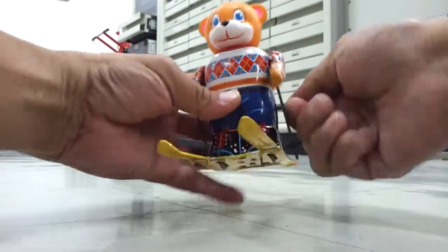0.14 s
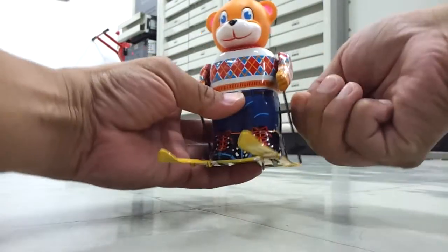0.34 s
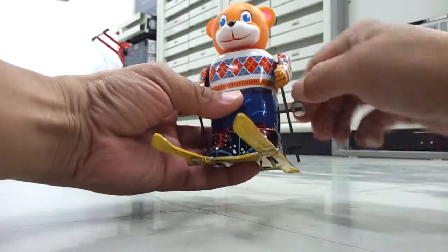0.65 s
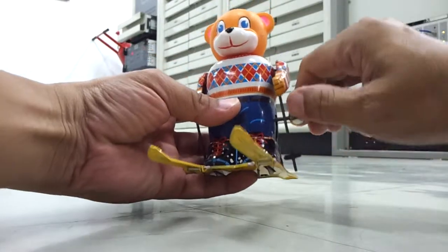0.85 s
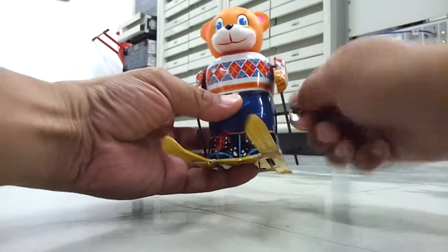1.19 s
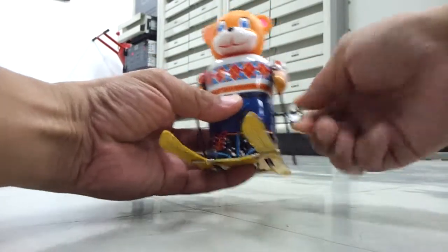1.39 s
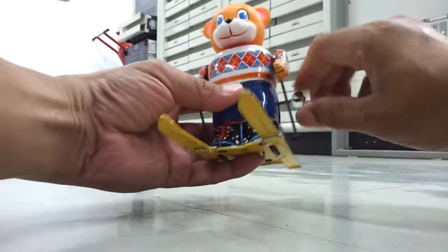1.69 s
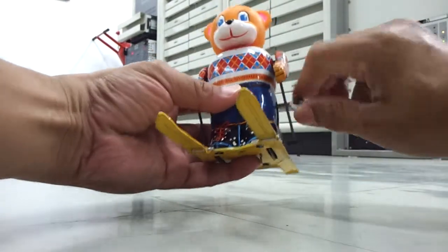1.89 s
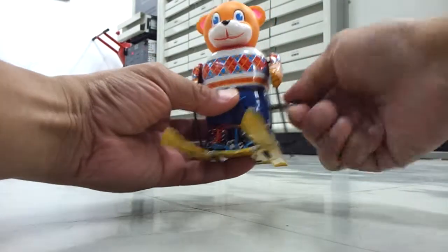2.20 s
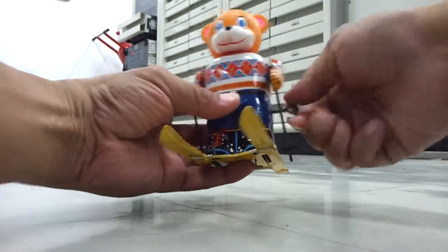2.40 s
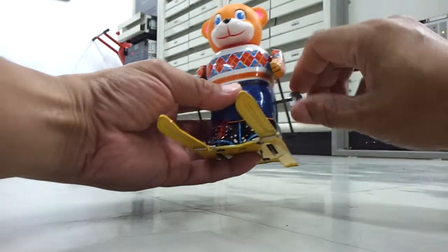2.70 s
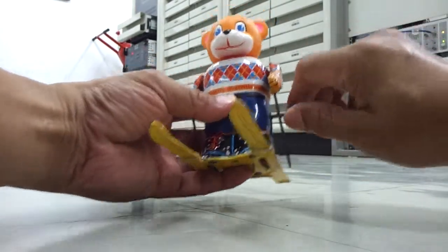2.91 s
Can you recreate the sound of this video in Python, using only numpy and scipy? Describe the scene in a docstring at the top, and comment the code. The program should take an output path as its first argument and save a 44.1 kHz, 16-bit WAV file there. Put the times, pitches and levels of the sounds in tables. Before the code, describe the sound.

A tin wind-up toy is wound by hand close to the microphone. The ratchet purrs briefly, then the key catches in sharp, irregular metallic clicks. Ventilation rushes and hums steadily in the room behind.

```python
"""The steel key of a tin wind-up toy, turned by hand up close. The ratchet purrs, then the key
catches in short chattering clicks that ring the tin shell; twice it pings as the fingers let go.
Behind it a ventilation machine rushes and hums, with a faint electric whine.
The clicks sound bright on the left and duller on the right, with a short room tail."""
import sys
import numpy as np
from scipy import signal
from scipy.fft import rfft, irfft, next_fast_len
from scipy.io import wavfile
from scipy.ndimage import map_coordinates

SR = 44100
rng = np.random.default_rng(int(sys.argv[2]) if len(sys.argv) > 2 else 0)


def master(y):
    """Save y as 16-bit WAV."""
    cut = np.clip(np.atleast_2d(y).T, -1, 1)
    pcm = np.round(cut * 32767)  # scale
    wavfile.write(sys.argv[1], SR, pcm.astype(np.int16))


N = 134505

CLICK_BOOST_DB, CLICK_BOOST_OCTAVES = 8.5, 0.07  # lift and half-width around a catch's favoured pitch
# The key catching. Each row: start in seconds, level in dB before the low cut, chatter length in
# seconds, favoured pitch in Hz, left over right in dB.
CATCHES = [(0.0168, -11.5, 0.0018, 3300, -1.5), (0.02, -13.5, .001, 11000, 13),
           (0.0225, -10, 0.0036, 5170, -0.5), (0.257, -12.5, .004, 6400, -1), (1.036, -22, .002, 5200, -3),
           (1.1333, -10, 0.0044, 4640, 0), (1.148, -23, .001, 4600, -8), (1.2082, -5, 0.0036, 5200, 1.5),
           (1.392, -22, .003, 5200, 0), (1.402, -21.5, 0.0045, 5000, -3), (1.9064, -15, 0.0016, 6550, 3),
           (1.9988, -12.5, 0.0025, 5530, 0), (2.0018, -12, 0.0052, 10900, -2.5),
           (2.043, -19, 0.0022, 4800, -6), (2.0868, -8, .001, 11500, -5), (2.0895, -14, .002, 11600, 1),
           (2.093, -12, .003, 4400, 0.5), (2.1772, -15.5, 0.0026, 5450, 3),
           (2.1834, -10.5, 0.0025, 5330, -1), (2.406, -20.5, 0.0046, 11500, -5),
           (2.4145, -16.5, 0.0043, 4900, -5), (2.861, -26, .006, 11000, 1)]


def key_clicks():
    """Each catch is a few milliseconds of metal chatter and a short ring; harder ones are crisper."""
    out, t = np.zeros((2, N)), np.arange(SR // 10) / SR
    attack_s, release_t60_s = 0.00028, 0.016
    body_hz, crisp_above_db = 3800, -15
    body_band = 1 / (1 + (np.fft.rfftfreq(len(t), 1 / SR) / body_hz) ** 10)
    for start, db, length, hz, pan_db in CATCHES:
        envelope = np.minimum(t / attack_s, 1) * amp(-60 * np.maximum(t - length, 0) / release_t60_s)
        force = envelope * contacts(per_s=2200, size=len(t))
        chatter = unit(coloured(force, hz, CLICK_BOOST_DB, CLICK_BOOST_OCTAVES))
        chatter *= amp(-0.5) * np.sqrt(np.mean(envelope ** 2))
        low_cut_db = max(db - crisp_above_db, 0) * body_band
        click = irfft(rfft(chatter + shell_ring(t, hz)) * amp(-low_cut_db), len(t))
        add(out, start, amp(db) * pan(pan_db) * click[:, :len(t) // 2])
    return out


def contacts(per_s, size, impact_share=0.4):
    """Metal chattering on metal: tiny impacts carry a share of the energy, friction noise the rest."""
    impacts = (rng.random(size) < per_s / SR) * rng.choice([-1, 1], size)
    friction = rng.standard_normal((2, size))
    return np.sqrt(impact_share) * unit(impacts) + np.sqrt(1 - impact_share) * friction


def favour(hz, favoured_hz, octaves):
    """A weight from 0 to 1, peaking at the resonance that a point of contact excites best."""
    return 1 / (1 + (np.log2((hz + 1) / favoured_hz) / octaves) ** 2)


# The shell's modes. Each row: pitch in Hz, relative level in dB, seconds to fall 60 dB.
SHELL_MODES = [(1710, -13, 0.031), (3310, -16.5, 0.036), (4555, -6.5, 0.017), (5500, -11, 0.012),
               (5900, -22, .015), (6450, -27, .025), (11230, -8, .018), (12600, -19, .018),
               (13400, -15, 0.062)]


def shell_ring(t, favoured_hz, attack_s=0.0003):
    """The struck shell rings in its modes, quickly damped by the hand."""
    ring = np.zeros((2, len(t)))
    for hz, db, t60 in SHELL_MODES:
        struck_db = db + CLICK_BOOST_DB * favour(hz, favoured_hz, CLICK_BOOST_OCTAVES)
        struck_db += rng.normal(0, 2.2)
        balance = unit(amp(along(CLICK_COLOUR, np.array([hz]))))
        mode = np.sin(2 * np.pi * (hz * t + rng.random((2, 1))))
        ring += amp(struck_db - 60 * t / t60) * balance * mode
    return ring * np.minimum(t / attack_s, 1)


# The tone colour of the clicks and ratchet as heard on each side.
# Each row: frequency in Hz, relative left and right levels in dB.
CLICK_COLOUR = [(300, -51, -51), (1780, -1, -16.5), (2400.0, -10, -32.5), (3040, -25, 1), (3650, -12, -14),
                (4350, -14, -5.5), (5230, -25, -4), (6000.0, -16, -7), (7700, -15.5, -18.5),
                (9640, -12, -21), (11300, 0, -20), (13300, -9.5, -24), (14900, -21, -15)]


def coloured(force, favoured_hz, boost_db, octaves, size=1024):
    """Give a contact its colour, bright left and duller right, with one resonance lifted."""
    hz = np.fft.rfftfreq(size, 1 / SR)
    colour_db = along(CLICK_COLOUR, hz) + boost_db * favour(hz, favoured_hz, octaves)
    # Minimum phase, so nothing sounds ahead of the hit.
    cepstrum = irfft(np.log(unit(amp(colour_db))))
    cepstrum[:, 1:size // 2] *= 2
    cepstrum[:, size // 2 + 1:] = 0
    impulse_response = irfft(np.exp(rfft(cepstrum)))
    return signal.fftconvolve(force, impulse_response, axes=1)[:, :force.shape[1]]


# The ratchet's swell through the first turn. Each row: time in seconds, level in dB.
RATCHET_SWELL = [(.02, -47), (.06, -29), (.12, -22.5), (.225, -21), (.25, -30), (.28, -24), (.305, -42),
                 (.4, -70)]


def ratchet_purr():
    """The winding ratchet purrs in quick, nearly regular rasps."""
    teeth_per_s, jitter, rasp_fall_db, uneven_db = 125, 0.1, 5, 2
    tooth_phase = np.cumsum(teeth_per_s * (1 + jitter * wobble(36))) / SR
    rasps = unit(amp(-rasp_fall_db * (tooth_phase % 1)))
    swell = amp(curve(RATCHET_SWELL) + uneven_db * wobble(38))
    force = swell * rasps * contacts(per_s=1800, size=N)
    return pan(0.5) * coloured(force, favoured_hz=11200, boost_db=5, octaves=0.03)


# The fingers letting go. Each row: start in seconds, level in dB.
RELEASES = [(1.400, -42), (2.411, -26)]


def key_pings():
    """The freed key rings at one very high pitch, right of centre."""
    out, t = np.zeros((2, N)), np.arange(SR // 4) / SR
    key_hz, attack_s, t60_s = 14310, 0.003, 0.16
    for start, db in RELEASES:
        envelope = amp(db - 60 * t / t60_s) * (1 - np.exp(-t / attack_s))
        add(out, start, pan(-6) * envelope * np.sin(2 * np.pi * key_hz * t))
    return out


DRONE_LEAD_S = 0.00041  # the machine's low drone reaches the left side first
# The colour of the rush. Each row: frequency in Hz, relative left and right levels in dB.
RUSH_COLOUR = [(20.0, -23, -27.9), (45.0, -7, -22.5), (80.0, -7.5, -13), (119, -2.5, -7), (161, 1.5, -5.5),
               (215.0, -2.54, -6.5), (321, -6.5, -7), (398, -13, -15.5), (453, -8, -7.5), (657, -14, -13),
               (760, -12.5, -11), (1016, -17, -17), (1830, -22.5, -17.5), (2580, -23.5, -20.5),
               (3260, -23.5, -22), (3730, -24.8, -19), (4550, -27.0, -18.0), (5160, -27, -20),
               (5620, -27.5, -27), (7000.0, -28.5, -31.5), (8700, -27.5, -44), (9600, -25.5, -48.3),
               (10650, -23.5, -57), (11400, -22, -78), (13000, -28, -84), (15200, -44, -78)]
# Its stereo image. Each row: frequency in Hz, left-right correlation (1 is mono).
RUSH_CORRELATION = [(40, 0.91), (130, 0.96), (250, 0.85), (470, 0.82), (900, -0.25), (1600, -0.16),
                    (4000, 0.025)]


def air_rush():
    """The ventilation moves air in a steady rush, narrow in the bass and wide above it."""
    def width(hz):
        angle = np.arccos(along(RUSH_CORRELATION, hz)[0]) / 2
        return np.array([np.cos(angle), np.sin(angle)])

    def colour(hz):
        bass_lead_s = DRONE_LEAD_S / (1 + (hz / 350) ** 2)
        return amp(along(RUSH_COLOUR, hz)) * np.exp(1j * np.pi * hz * bass_lead_s * [[1], [-1]])

    mid, side = filtered(rng.standard_normal((2, N)), width)
    return amp(-17) * unit(filtered(np.array([mid + side, mid - side]), colour))


# The hum's partials. Each row: pitch in Hz, level in dB, left over right in dB, depth of waver.
HUM_PARTIALS = [(64.6, -40, 20, .3), (129.16, -23.5, 7.5, .1), (168.5, -28.5, 8, .7),
                (224.2, -37.5, 8, 0.57), (471, -42, 13, 0.84), (530, -37, -8, 0.59), (602, -36.5, 4, .4),
                (1206, -38, -8, 0.37), (4650, -46.5, -8, 0.34)]
# The swell of the throbbing partial. Each row: time in seconds, level in dB.
THROB_SWELL = [(0, -28), (.25, -23.5), (.6, -29), (1.1, -22), (1.4, -33), (1.8, -21), (2.08, -18),
               (2.3, -34), (2.62, -31.5), (2.85, -17.5), (3.05, -19)]


def machine_hum():
    """The machine drones in wavering partials, while one more swells and fades."""
    hum = sum(amp(db) * pan(pan_db) * tone(hz, waver, DRONE_LEAD_S)
              for hz, db, pan_db, waver in HUM_PARTIALS)
    throb = amp(curve(THROB_SWELL)) * pan(3) * tone(hz=192.9, waver=0.12, lead_s=DRONE_LEAD_S)
    return hum + throb


# The whine's cluster. Each row: pitch in Hz, relative level in dB.
WHINE_PARTIALS = [(9700, -55), (9900, -52), (10000, -48), (10050, -54), (10200, -50), (10300, -49)]


def electric_whine(gain_db=3.5):
    """A thin electric whine of close, high tones, far to the left."""
    return pan(21) * sum(amp(db + gain_db) * tone(hz, waver=0.32) for hz, db in WHINE_PARTIALS)


def room(x, t60_s=0.27):
    """The room's reflections blur into a short diffuse tail."""
    t = np.arange(SR // 3) / SR
    tail = rng.standard_normal((2, len(t))) * amp(-60 * t / t60_s)
    return signal.fftconvolve(x, tail / np.linalg.norm(tail[0]), axes=1)[:, :N]


def tone(hz, waver, lead_s=0):
    """A stereo sine of rms 1 that wavers in level and phase, the left side ahead by lead_s."""
    drift = 1 + waver * (wobble(6.85) + 1j * wobble(7))
    t = np.arange(N) / SR + np.array([[lead_s / 2], [-lead_s / 2]])
    return unit(np.real(drift * np.exp(2j * np.pi * (hz * t + rng.random()))))


def amp(db):
    """Decibels to gain."""
    return 10 ** (np.asarray(db) / 20)


def unit(x):
    """Scale to rms 1."""
    return x / np.sqrt(np.mean(x ** 2) + 1e-20)


def pan(db):
    """Constant-power gains, left over right by db."""
    return unit(amp([[db / 2], [-db / 2]]))


def along(points, hz):
    """Each column of a table, read on a log frequency axis."""
    knots_hz, *columns = np.transpose(points)
    return np.array([np.interp(np.log(hz + 1), np.log(knots_hz + 1), c) for c in columns])


def curve(rows):
    """One value per sample from (seconds, value) points."""
    return np.interp(np.arange(N) / SR, *np.transpose(rows))


def wobble(rate):
    """A smooth random curve, rate knots a second."""
    return map_coordinates(rng.standard_normal(int(N * rate / SR) + 4), [np.arange(N) * rate / SR])


def filtered(x, response):
    """Shape x with a gain given as a function of Hz."""
    size = next_fast_len(N + 8192)
    return irfft(rfft(x, size) * response(np.fft.rfftfreq(size, 1 / SR)), size)[..., :N]


def add(out, start, sound):
    """Mix a sound in at start seconds."""
    part = out[:, max(round(start * SR), 0):][:, :sound.shape[-1]]
    part += sound[..., :part.shape[1]]


def scene():
    """The toy up close with a touch of room, the ventilation behind."""
    toy = key_clicks() + key_pings() + ratchet_purr()
    return toy + amp(-10.5) * room(toy) + air_rush() + machine_hum() + electric_whine()


def record(dry):
    """Flatten peaks at full scale, then cut the very top of the treble."""
    return filtered(np.clip(dry, -1, 1), lambda hz: hz < 14650)


dry = scene()
out = record(dry)
master(out)
```